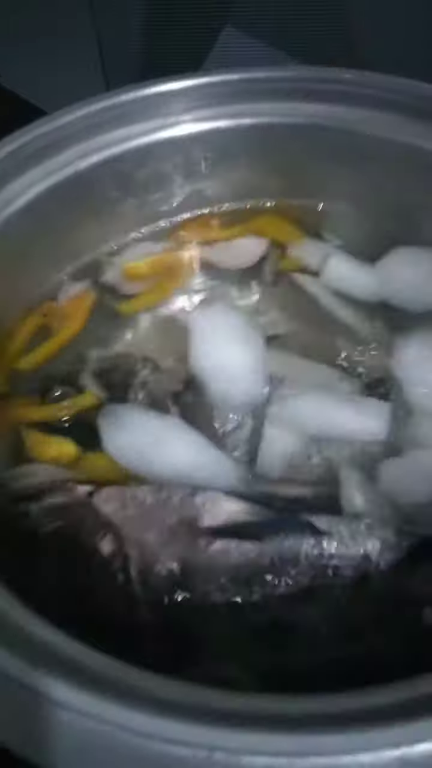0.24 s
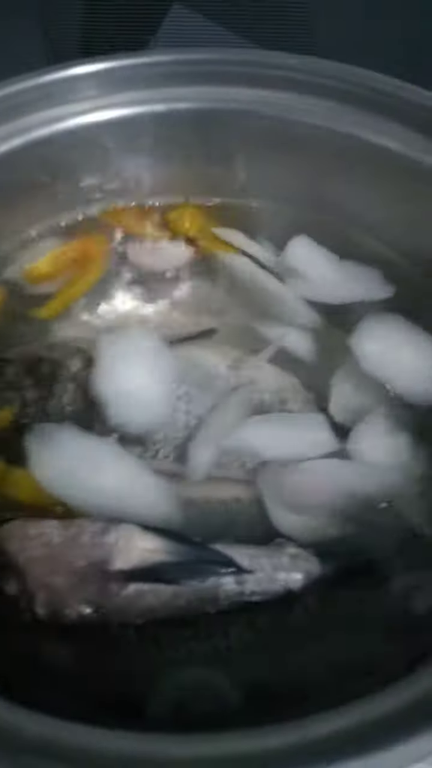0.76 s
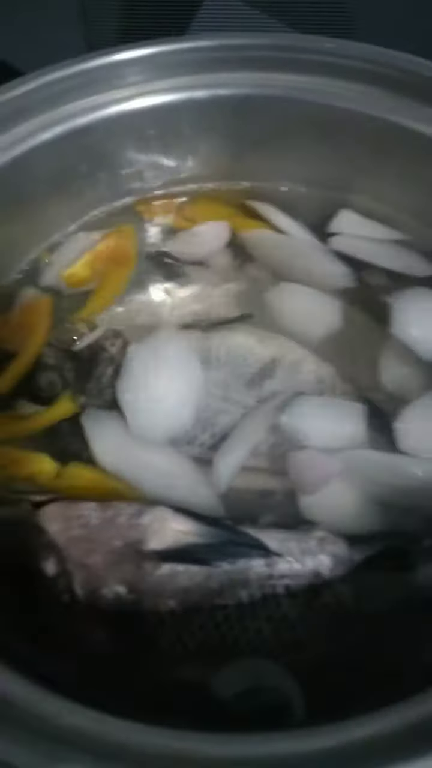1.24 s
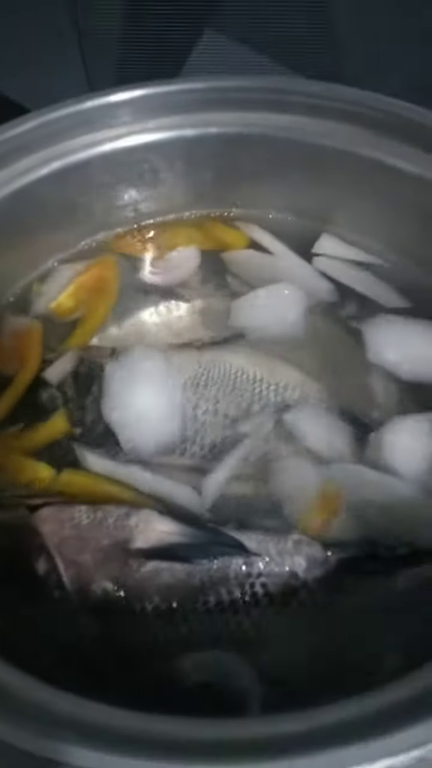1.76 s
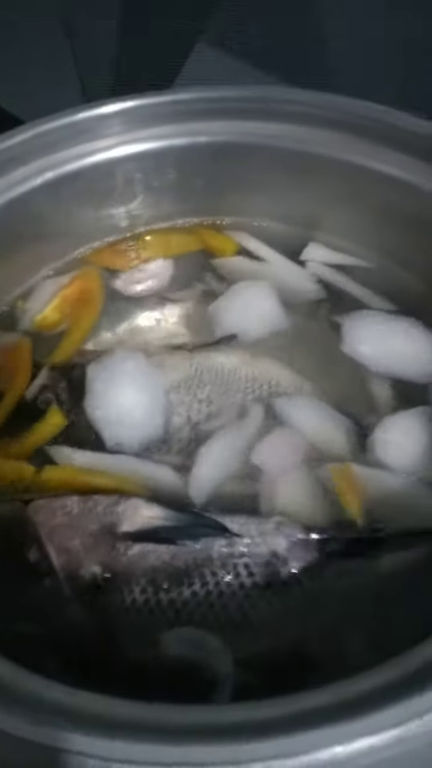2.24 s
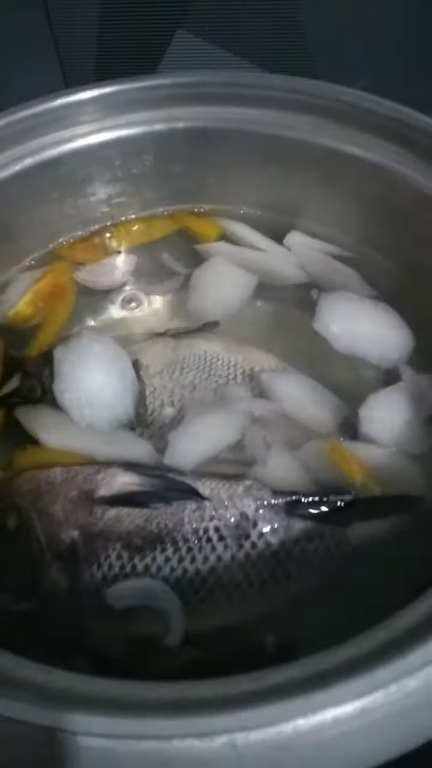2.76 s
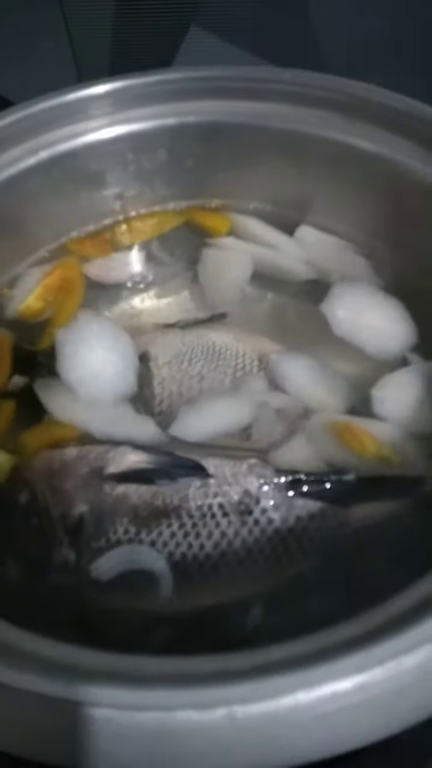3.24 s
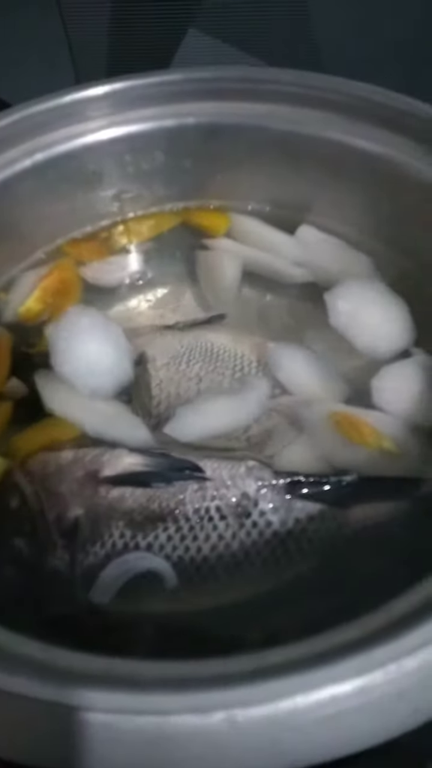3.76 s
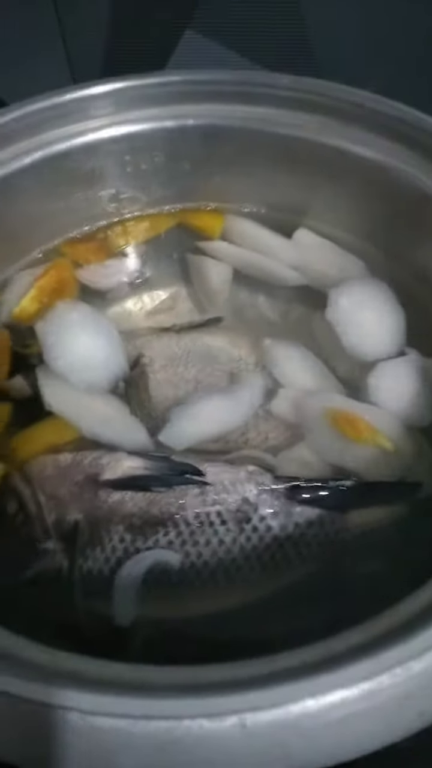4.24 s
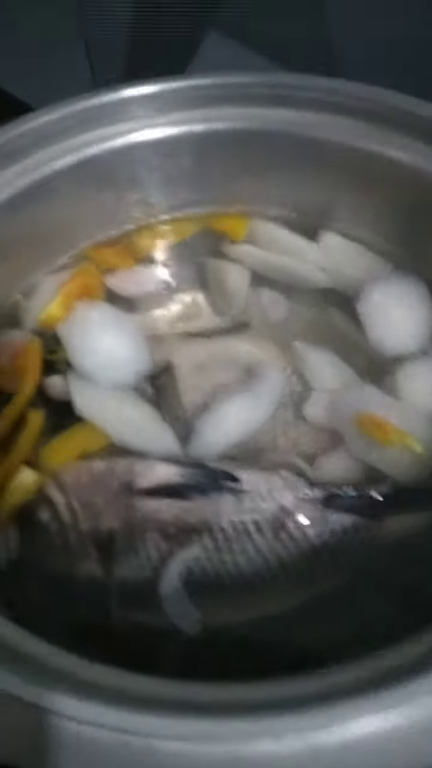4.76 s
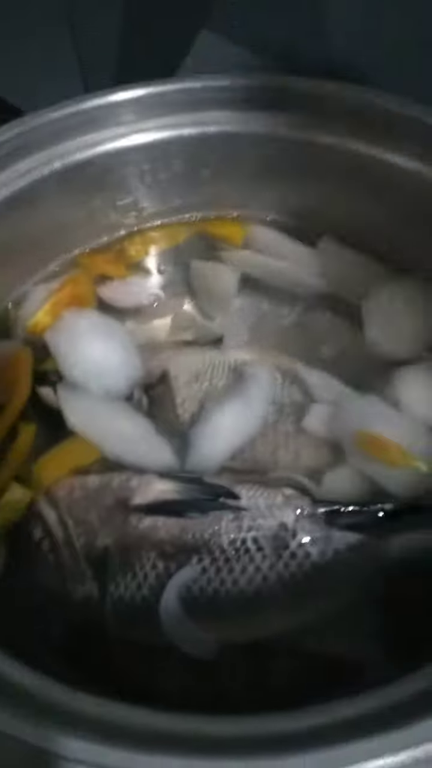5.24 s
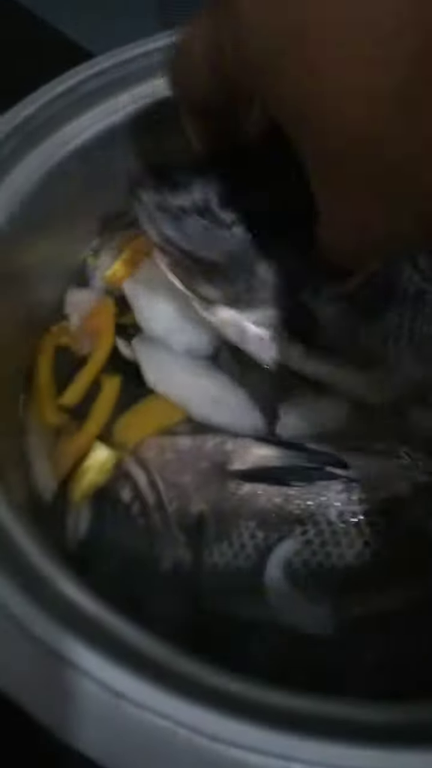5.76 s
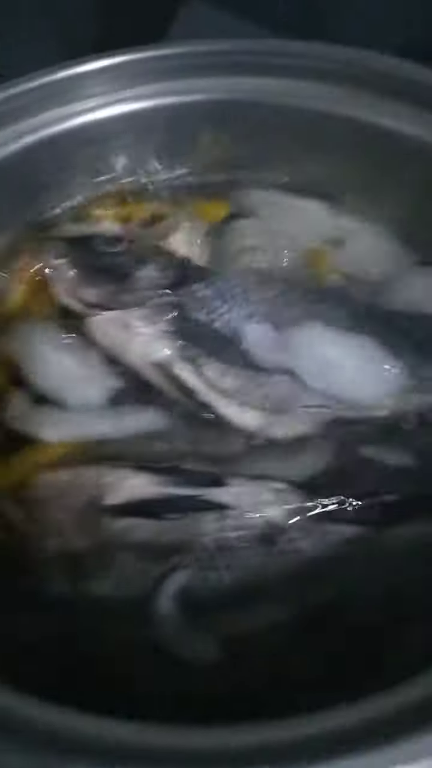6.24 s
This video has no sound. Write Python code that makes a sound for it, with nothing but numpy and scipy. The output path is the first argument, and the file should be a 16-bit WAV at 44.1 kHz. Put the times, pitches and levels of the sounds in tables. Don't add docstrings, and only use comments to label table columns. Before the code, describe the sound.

A small kitchen, heard close through a handheld stereo microphone. A gas jet hisses steadily and brightly on both sides for about six and a half seconds, over a low, uneven rumble of flame, water and pot wall, strongest at the start. A very faint motor whine lies beneath. At 0.1 s a blunt knock jolts the right side only. Soft double thud at 0.8 s, faint touches near 1.6 s, then a crisp clustered clink of thin aluminium at 1.9 s. At 2.3 s a very fast triple knock hits the right capsule, followed at 2.5 s by the loudest jolt, a heavy popping thump. Around 2.96 s the pot is knocked firmly, mostly left, with a dull short ring and the strongest low thud. Faint taps and thuds follow at 3.5-4.8 s, a light rim rattle at 5.7 s, and small clinks with a thud near 6.1 s.

```python
import sys
import numpy as np
from scipy import signal
from scipy.fft import rfft, irfft
from scipy.io import wavfile

SR = 44100
rng = np.random.default_rng(int(sys.argv[2]) if len(sys.argv) > 2 else 0)


def decibels_to_gain(level_db):
    exponent = np.asarray(level_db, float) / 20
    return 10 ** exponent


def wrap_up_sound(samples):
    columns = np.atleast_2d(samples).T
    tamed = np.clip(columns, -1, 1)
    steps = np.round(tamed * 32767).astype(np.int16)
    wavfile.write(sys.argv[1], SR, steps)


N = 286585
TIME = np.arange(N) / SR
HZ = np.maximum(np.fft.rfftfreq(N, 1 / SR), 1)


def rms_one(x):
    return x / np.sqrt(np.mean(x ** 2) + 1e-20)


def lag(x, seconds):
    r = np.exp(-1 / (seconds * SR))
    return signal.lfilter([1 - r], [1, -r], x)


def high_pass(x, hz):
    return signal.sosfilt(signal.butter(2, hz, "high", fs=SR, output="sos"), x)


def drift(rate):
    r = np.exp(-80 * np.pi * rate / SR)
    slow = signal.lfilter([1], [1, -2 * r, r * r], rng.standard_normal(N // 40 + 2002))[2000:]
    return np.interp(np.arange(N) / 40, np.arange(len(slow)), rms_one(slow))


def swells(rows, width):
    return sum(change * np.exp(-((TIME - s) / width) ** 2) for s, change in rows)


def ring(clicks, modes):
    out = 0
    for hz, db, t60 in modes:
        r = decibels_to_gain(-60 / (t60 * SR))
        w = 2 * np.pi * hz / SR
        out = out + signal.lfilter([0, decibels_to_gain(db) * np.sin(w)], [1, -2 * r * np.cos(w), r * r], clicks + 1e-18)
    return out


def coloured_noise(spectrum, peaks, edges, flicker_db, rate):
    hz, db = np.transpose(spectrum)
    shape_db = np.interp(np.log(HZ), np.log(hz), db, right=-90)
    for at, width, top_db in peaks:
        shape_db += top_db / (1 + (2 * (HZ - at) / width) ** 2)
    white = rfft(rng.standard_normal(N)) * decibels_to_gain(shape_db)
    together = drift(rate)
    out = 0
    for row in np.eye(len(edges)):
        band = np.interp(np.log(HZ), np.log(edges), row)
        out = out + irfft(white * band, N) * decibels_to_gain(flicker_db * (drift(rate) + together))
    return out


# (t/s, level/dB)
BURNER_LEVEL = [(0.0, -49), (0.8, -48.5), (2.12, -49), (2.28, -48.5), (3.4, -48), (3.67, -48),
                (4.94, -48.5), (5.54, -47), (6.03, -48.5), (6.32, -48), (6.5, -47)]
# (f/Hz, level/dB per Hz)
HISS_COLOUR = [(30, -7), (300, 2.5), (600, 0), (1100, 0), (1600, -3.5), (2600, -2), (3800, -4),
               (5000, -3.5), (6000, -4), (7000, 1), (8500, 0.5), (10500, 0), (13000, 4), (16000, 1.5),
               (18000, 2)]
# (f/Hz, width/Hz, level/dB)
HISS_PEAKS = [(836, 46, 5), (1380, 140, 2.5), (2025, 82, 6), (4180, 70, 7), (5350, 43, 6), (5570, 50, 2.5)]
# (f/Hz, width/Hz, level/dB)
DUCTS = [
    [(7030, 90, 4.5), (7440, 140, 5.5), (9000, 300, 2.5), (11600, 2350, -11.5)],
    [(7000, 1800, 3.5), (8600, 450, 0), (9460, 230, 4), (10500, 120, 2.5)],
]


def burner():
    edges = [30, 300, 1200, 3000, 5500, 8000, 11000, 15000]
    hiss = [coloured_noise(HISS_COLOUR, [*HISS_PEAKS, *duct], edges, flicker_db=0.62, rate=5.8)
            for duct in DUCTS]
    s, level_db = np.transpose(BURNER_LEVEL)
    side_db = np.array([[.6], [-.6]])
    return rms_one(np.array(hiss)) * decibels_to_gain(np.interp(TIME, s, level_db) - 5.5 + side_db)


# (f/Hz, level/dB per Hz)
FLAME_COLOUR = [(15, -6.5), (40, -3), (68, -4), (85, -2.5), (130, -2), (185, -6.5), (240, -15), (300, -47)]
# (f/Hz, width/Hz, level/dB)
FLAME_MODES = [(121.6, 18, 8), (156.3, 5.3, 9.5), (182.6, 12, 6)]
# (t/s, change/dB)
DRAUGHTS = [
    (0.02, 9),
    (0.65, -5),
    (2.4, -5),
    (3.0, 3),
    (3.75, -3),
    (4.8, -0.5),
    (5.2, 2.5),
    (5.6, 1),
    (5.8, -2),
]
# (f/Hz, level/dB per Hz)
WATER_COLOUR = [(150, -19), (235, -17.5), (270, 3), (350, 2.5), (430, -7), (465, -4), (560, -21)]
# (f/Hz, width/Hz, level/dB)
WATER_MODES = [(280, 6.7, 6), (305, 31, 4.5), (420.6, 14.4, 14)]
# (t/s, change/dB)
SURGES = [(0.13, 4.5), (0.8, -4), (1.2, 2), (2.1, 2.5), (2.62, 7), (3.05, 2.5), (3.4, 3.5), (3.78, 5.5),
          (4.2, 3), (5.0, 3.5), (5.5, 4.5), (6.1, 2)]
# (f/Hz, level/dB per Hz)
WALL_COLOUR = [(520, -12), (600, -9), (680, -4), (760, -7), (820, -29), (900, -11)]
# (f/Hz, width/Hz, level/dB)
WALL_MODES = [(630, 10, 0), (652, 8, -7.5), (703, 11, 12.5), (734, 13, 5.5)]
# (t/s, peak level/dB)
THUDS = [
    (0.79, -42.5),
    (0.821, -41),
    (2.967, -35),
    (3.642, -44),
    (4.31, -40.5),
    (4.454, -43.5),
    (4.839, -40.5),
    (6.046, -41),
    (6.065, -42),
]
# (f/Hz, level/dB, time to fall 60 dB/s)
THUD_MODES = [(110, -3, 0.1), (154, -1.5, 0.054), (283, -4, 0.074)]


def simmer():
    surge_db = swells(SURGES, 0.17)
    flame_db = -60.5 + swells(DRAUGHTS, .15)
    water_db = -65.5 + surge_db
    wall_db = -70 + 0.45 * surge_db
    flame = coloured_noise(FLAME_COLOUR, FLAME_MODES, [30, 90, 170], flicker_db=2.0, rate=7)
    water = coloured_noise(WATER_COLOUR, WATER_MODES, [280, 420], flicker_db=1.5, rate=10.0)
    wall = coloured_noise(WALL_COLOUR, WALL_MODES, [620, 750], flicker_db=0.1, rate=30)
    pushes = np.zeros(N)
    for s, peak_db in THUDS:
        pushes[round(s * SR)] = decibels_to_gain(peak_db - 6)
    rumble = rms_one(flame) * decibels_to_gain(flame_db + 1.25)
    rumble += rms_one(water) * decibels_to_gain(water_db - 0.2)
    rumble += rms_one(wall) * decibels_to_gain(wall_db + 0.9)
    return rumble + high_pass(ring(pushes, THUD_MODES), 70)


# (t/s, level/dB, place 0-4 from base to lip, rattle length/s, left minus right/dB)
TOUCHES = [(0.367, -66.5, 2.1, 0.0049, 6), (1.585, -57, 1.9, 0.011, 4), (1.6178, -59.5, 1.75, .006, -3),
           (1.887, -39.5, 3.52, 0.0037, -1), (1.909, -43.5, 1.45, 0.0029, 2), (1.919, -50, 1.65, 0.0035, 8),
           (1.929, -52, 1.72, 0.016, 1), (2.954, -50, .8, 0.0029, -9), (2.96, -38.5, 0.83, 0.0096, 9),
           (2.965, -37, .05, 0.0063, 5), (2.972, -40.5, .05, 0.018, 14), (3.001, -49.5, .9, 0.0084, 2),
           (3.505, -55.5, 1.45, 0.0096, 10), (4.31, -57.5, 1.87, 0.02, 2), (5.728, -47, 3.5, 0.021, -6),
           (5.875, -55, 2.8, 0.0039, -4), (5.888, -61.5, 2.1, 0.0067, 0), (6.065, -55, 1.5, 0.0059, -6),
           (6.12, -54, 1.5, 0.0064, -7)]
# (body level/dB, rim level/dB, tick level/dB)
PLACES = [
    (-4.3, -16.5, -5.5),
    (-1, -24, -18),
    (-2, 6.2, -9),
    (-19, 0.1, -1),
    (-24, -36, 1.5),
]
# (f/Hz, level/dB, time to fall 60 dB/s)
BELLY_MODES = [(392, -25, 0.04), (577, -2.5, 0.14)]
# (f/Hz, level/dB, time to fall 60 dB/s)
BODY_MODES = [(784, -21, 0.036), (857, -1, 0.051), (983, -10, 0.055), (1060, -13, 0.034),
              (1350, -23, 0.031)]
# (f/Hz, level/dB, time to fall 60 dB/s)
RIM_MODES = [(1810, 2.5, 0.014), (2200, -11.5, 0.041), (2430, -5, 0.031), (2840, -2.5, 0.013),
             (3290, -0.5, 0.032), (3640, -1, 0.019), (4160, 1.5, 0.014), (4860, -0.5, 0.011)]


def clinks():
    belly, body, rim, tick = np.zeros((4, 2, N))
    size = 3000
    age = np.arange(size) / SR
    for s, touch_db, place, length, pan_db in TOUCHES:
        body_db, rim_db, tick_db = [touch_db + np.interp(place, range(len(PLACES)), column)
                                    for column in np.transpose(PLACES)]
        length = max(length, .001)
        draw = rng.standard_normal((3, size))
        rattle = (0.37 * draw[0] + 1.08 * draw[1:]) * np.exp(-(age / length) ** 2)
        rattle *= decibels_to_gain(np.array([[.5], [-.5]]) * pan_db)
        sparse = rattle / np.sqrt(length * SR)
        i = round(s * SR)
        body[:, i:i + size] += decibels_to_gain(body_db + 6) * sparse
        belly[:, i:i + size] += decibels_to_gain(2 * body_db + 40) * sparse
        rim[:, i:i + size] += decibels_to_gain(rim_db + 2) * sparse
        tick[:, i:i + size] += decibels_to_gain(tick_db - 3) * rattle
    return ring(belly, BELLY_MODES) + ring(body, BODY_MODES) + ring(rim, RIM_MODES) + high_pass(tick, 6500)


JOLT_TIMES = [
    .09673,
    2.31560,
    2.31637,
    2.31692,
    2.48596,
    2.48744,
    2.52814,
]
# (level/dB, share that creeps on, or back if negative)
JOLT_STEPS = [
    (-11.8, .2),
    (-18, .22),
    (-14.7, .22),
    (-9.5, .22),
    (-14.5, -.3),
    (-1.8, -.3),
    (-18, -.3),
]
LEAKS = [3.64, 3.64, .09]


def jolts():
    jump, creep = np.zeros((2, N))
    for s, (height_db, late) in zip(JOLT_TIMES, JOLT_STEPS):
        jump[round(s * SR):] += decibels_to_gain(height_db)
        creep[round(s * SR):] += decibels_to_gain(height_db) * late
    settle_share, settle_s, creep_s = .29, .0008, .091
    pressure = (1 - settle_share) * jump + settle_share * lag(jump, settle_s) + lag(creep, creep_s)
    shiver_db, shiver_s, shiver_hz = -24.5, 0.0017, 4100
    low_pass = signal.butter(2, shiver_hz, fs=SR, output="sos")
    shiver = rms_one(signal.sosfilt(low_pass, rng.standard_normal(N)))
    pressure = pressure + decibels_to_gain(shiver_db) * shiver * (jump - lag(jump, shiver_s))
    for hz in LEAKS:
        pressure = pressure - lag(pressure, 1 / (2 * np.pi * hz))
    return pressure * [[0], [1]]


# (multiple of its hum, left level/dB, right level/dB)
MOTOR_TONES = [(5, -103, -74), (9, -82, -82.5), (11, -87, -87), (13, -80.5, -78), (15, -83, -86),
               (17, -77.5, -89), (25, -87, -88), (27, -104, -91), (31, -76, -85)]


def motor():
    turn = 2 * np.pi * 119.68 * TIME
    whine = 0
    for k, left_db, right_db in MOTOR_TONES:
        level = decibels_to_gain(np.array([[left_db], [right_db]]) + 4.5)
        whine = whine + level * np.sin(round(k) * turn + rng.uniform(0, 2 * np.pi, (2, 1)))
    return whine


# (f/Hz, sharpness)
PORTS = [
    (7350, 4.8),
    (10500, 7.93),
]


def port(x):
    out = []
    for side, (hz, sharp) in zip(x, PORTS):
        tune = HZ / hz
        out.append(irfft(rfft(side) / (1 - tune * tune + 1j * tune / sharp), N))
    return np.array(out)


def scene():
    return port(burner() + simmer() + motor() + clinks()) + jolts()


def roll_off(x):
    return signal.sosfilt(signal.butter(12, 15830, fs=SR, output="sos"), x)


def record(dry):
    return roll_off(dry)


dry = scene()
out = record(dry)
wrap_up_sound(out)
```